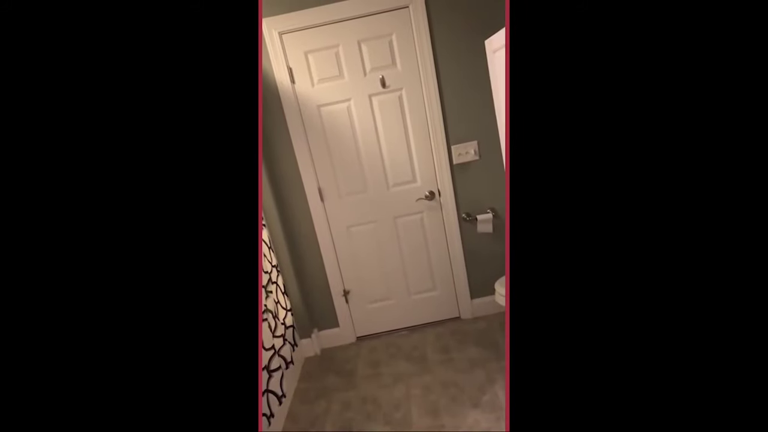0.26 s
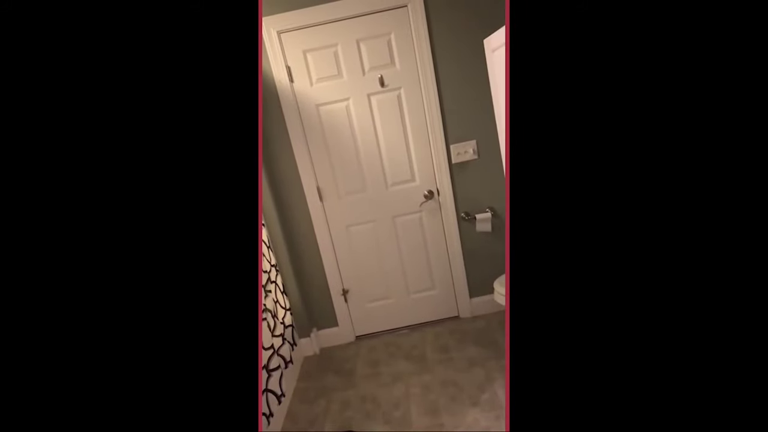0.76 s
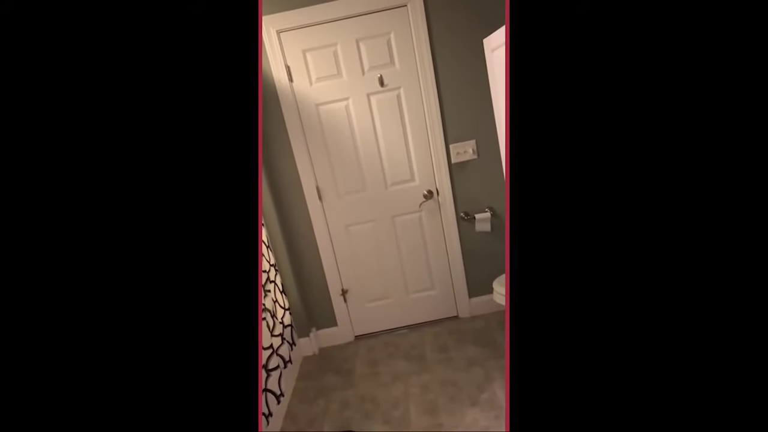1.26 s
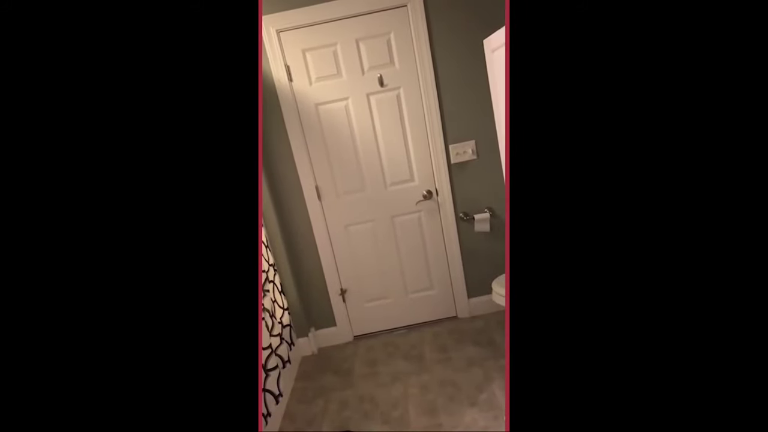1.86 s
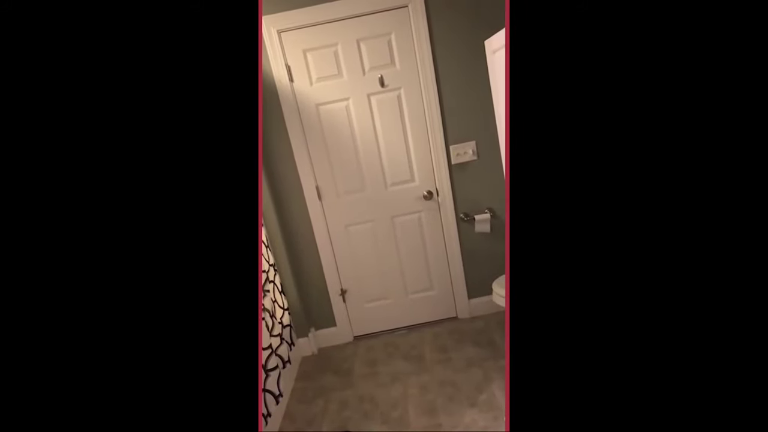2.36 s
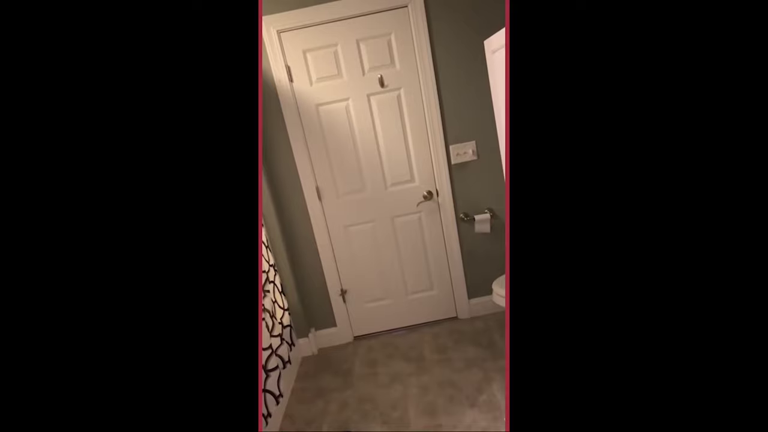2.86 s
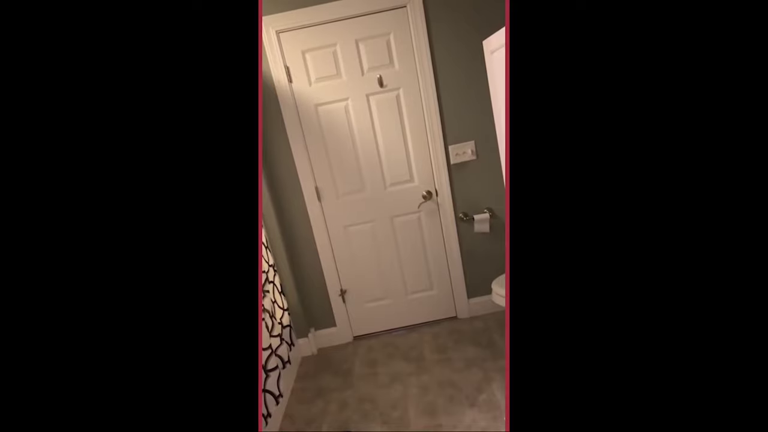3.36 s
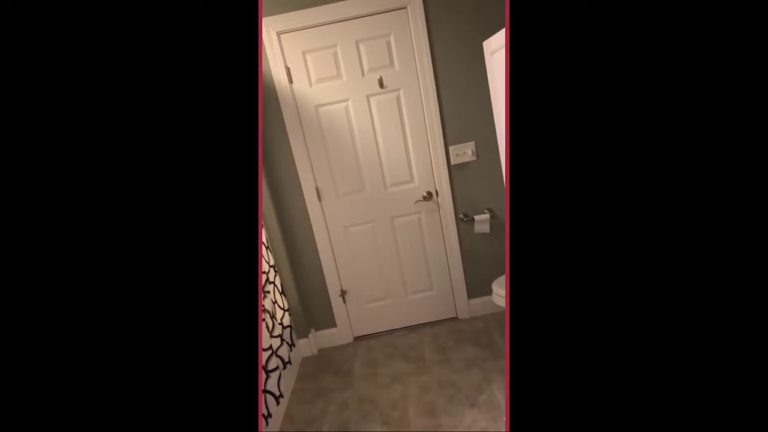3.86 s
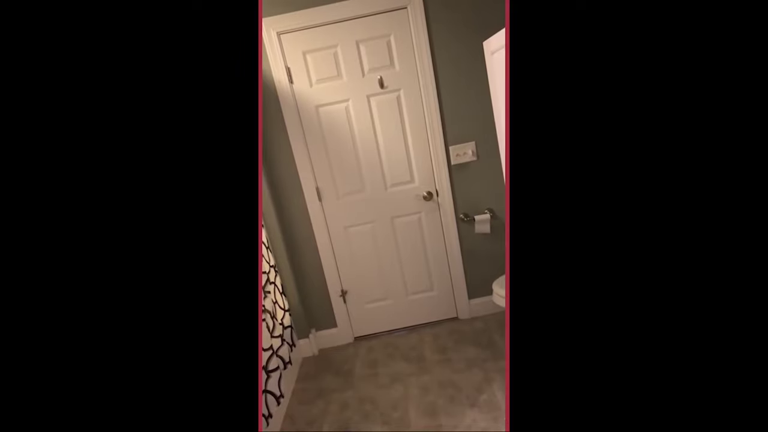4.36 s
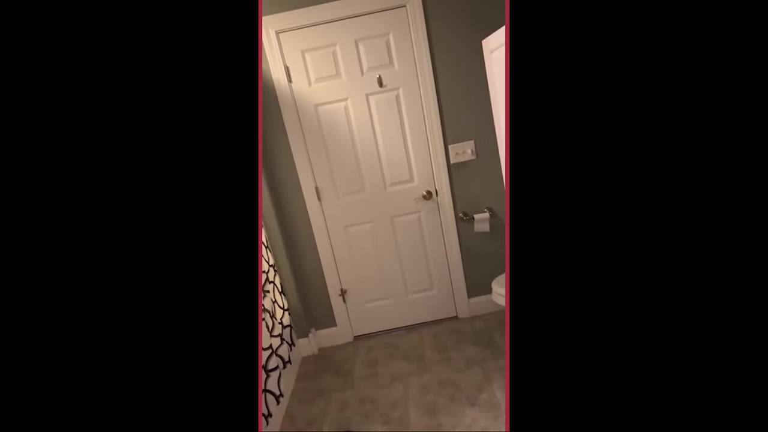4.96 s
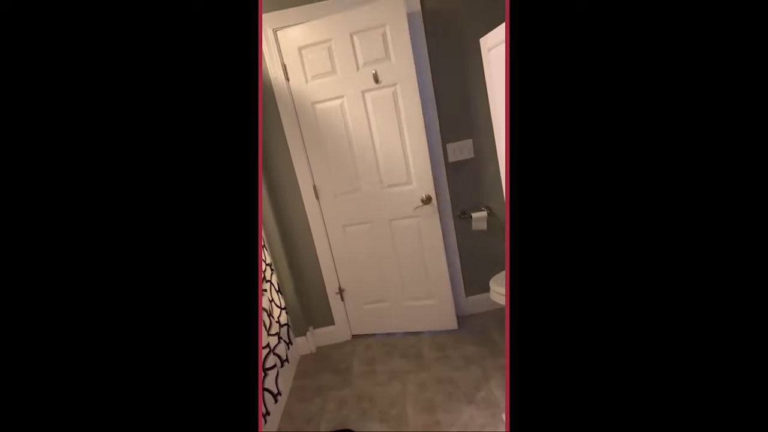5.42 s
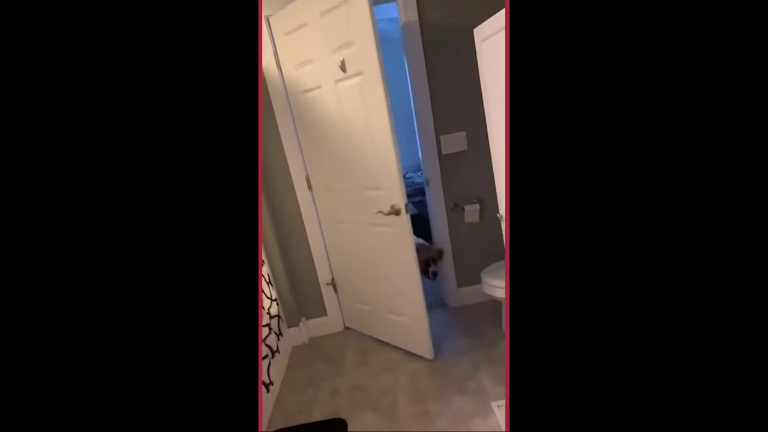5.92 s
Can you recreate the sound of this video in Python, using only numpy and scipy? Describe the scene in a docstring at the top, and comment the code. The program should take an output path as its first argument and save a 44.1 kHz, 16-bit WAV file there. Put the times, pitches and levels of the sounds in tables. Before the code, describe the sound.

Bursts of claw scrapes, hollow wooden knocks and clacking door hardware echo in a small tiled bathroom, ending with a paw skidding off the opening door.

```python
"""Dog pawing at a closed hollow door, heard in a tiled bathroom

Claws stick and slip down the panels in bursts; blows and shoves excite panel, skin and slab modes.
Lever, latch and claw tips clack with a ringing spring; claw scrapes, door ringing and pads give rough tones.
At last the latch gives: a paw skids off the swinging door with a slowing judder, and the door shudders.
Contacts pass through synthetic tiled-room responses, over a low house hush."""
import sys
import numpy as np
from scipy import signal
from scipy.fft import rfft, irfft
from scipy.io import wavfile
from scipy.ndimage import uniform_filter1d

SR = 44100
rng = np.random.default_rng(int(sys.argv[2]) if len(sys.argv) > 2 else 0)


def digitize_waveform(pressure):
    """Quantize a signal to 16-bit integers and store it at the path in sys.argv[1].

    Rows of a 2-D input are taken as channels; values are limited to [-1, 1].
    """
    field = np.atleast_2d(pressure).T
    bounded = np.clip(field, -1, 1)
    quanta = np.round(bounded * 32767).astype(np.int16)
    wavfile.write(sys.argv[1], SR, quanta)


N = 272929
TIME_S = np.arange(N) / SR
RING_S = np.arange(SR) / SR

# Levels are relative unless a function uses them without a further gain.
# paw blows on the panels: [start_s, hard_rap_db, dull_pad_thud_db]
KNOCKS = [(0.01, -17, -21.5), (0.429, -42.5, -44), (0.576, -13, -20.5), (0.834, -17.5, -30),
          (0.907, -23.5, -18.5), (0.931, -16.5, -26), (1.001, -22.5, -31.5), (1.082, -16, -35.5),
          (1.164, -18.5, -39), (1.24, -30, -34.5), (1.644, -21, -30), (1.672, -20.5, -29),
          (1.697, -18, -12), (1.737, -22, -46), (1.771, -18, -41.5), (1.784, -26.5, -25),
          (1.949, -22.5, -41.5), (1.996, -25.5, -39.5), (2.068, -32.5, -32.5), (2.1, -28.5, -32),
          (2.335, -42, -49), (2.376, -21, -23.5), (2.417, -31.5, -19), (2.454, -17, -21.5),
          (2.491, -35, -15), (2.523, -20, -18), (2.562, -19.5, -18), (2.689, -21.5, -33.5),
          (2.839, -26, -28), (3.298, -38, -60), (3.662, -21.5, -37), (3.682, -28.5, -40), (3.718, -17, -27),
          (3.755, -15.5, -14), (3.832, -12, -20), (3.854, -21.5, -31.5), (4, -39.5, -28), (4.052, -32, -40),
          (4.276, -14, -22), (4.323, -15, -32), (4.381, -11.5, -24.5), (4.435, -16, -13),
          (4.507, -18, -15.5), (4.563, -23, -33), (4.842, -24.5, -25), (4.997, -14.5, -22.5),
          (5.07, -12.5, -38.5), (5.125, -27, -14.5), (5.184, -21, -19.5), (5.29, -31, -12.5),
          (5.49, -27.5, -38), (5.525, -33, -45), (5.686, -22.5, -20), (5.745, -25, -22), (5.82, -29, -37),
          (5.9, -35, -20.5)]
# clacks of lever, latch and claw tips: [start_s, clack_db, metallic_snap_db]
CLACKS = [(0.0162, -23, -40.5), (0.521, -45, -54.5), (0.576, -29.5, -38.5), (0.754, -31, -45.5),
          (.8357, -31.5, -41), (0.874, -29.5, -35), (0.924, -27.5, -35.5), (0.934, -29.5, -46.5),
          (1, -28.5, -41), (1.084, -36, -60), (1.163, -21, -32.5), (1.35, -46.5, -57.5),
          (1.365, -31.5, -44.5), (1.687, -22.5, -43), (1.738, -19, -36.5), (1.934, -28, -44),
          (1.948, -22.5, -30.5), (2.091, -38.5, -57), (2.374, -30.5, -53.5), (2.3986, -22.5, -34),
          (2.4433, -19, -35.5), (2.459, -25, -34), (2.5474, -21.5, -38), (2.659, -16.5, -29),
          (2.84, -47, -68), (3.288, -44, -73), (3.677, -29, -44.5), (3.717, -26, -42),
          (3.7536, -19.5, -33.5), (3.773, -21, -36), (3.8249, -23.5, -32), (3.855, -38, -42),
          (4.11, -38.5, -61.5), (4.1383, -29.5, -48), (4.2232, -31, -49), (4.2549, -25, -30.5),
          (4.3128, -20.5, -32), (4.375, -29, -35), (4.4276, -25, -31.5), (4.842, -22.5, -42),
          (4.996, -27, -32), (5.0587, -24.5, -32.5), (5.112, -20.5, -33), (5.202, -26.5, -46),
          (5.249, -25, -51), (5.3395, -19.5, -64), (5.519, -36, -50), (5.683, -18, -29),
          (5.7284, -25.5, -30.5), (5.79, -29, -29)]
# dog's weight bumping the door in its frame: [start_s, slab_sway_db, skin_boom_db]
SHOVES = [(0.011, -39, -34.5), (0.576, -36, -40), (0.839, -26, -38.5), (1.004, -36, -28),
          (1.079, -52, -35.5), (1.164, -48, -29.5), (1.371, -33, -45.5), (1.771, -40, -35),
          (2.068, -31.5, -38.5), (2.454, -17, -32.5), (2.518, -23, -32.5), (2.659, -29, -35),
          (3.756, -49, -27.5), (3.829, -22, -24.5), (3.997, -30, -40.5), (4.427, -20, -29),
          (4.505, -47, -27.5), (4.579, -45, -44), (5.127, -27, -42), (5.196, -24, -43), (5.299, -35, -38),
          (5.429, -41, -52), (5.789, -25.5, -27.5), (5.901, -39, -42)]
# paw strokes down the door: [start_s, length_s, crest_share_of_length, wood_drag_db, claw_bite_db]
STROKES = [(0.166, 0.11, 0.5, -39.5, -22.5), (0.529, 0.078, 0.26, -57, -36),
           (0.745, 0.24, 0.85, -33, -27.5), (0.841, 0.17, 0.78, -22, -25.5),
           (0.99, 0.18, 0.28, -22.5, -24.5), (1.16, 0.13, 0.24, -24.5, -27.5),
           (1.359, 0.17, 0.12, -36.5, -44), (1.656, 0.15, 0.31, -16, -21), (1.94, 0.077, 0.15, -23.5, -42),
           (1.981, 0.14, 0.49, -31, -35), (2.288, 0.09, 0.9, -37, -37.5), (2.36, 0.14, 0.42, -18.5, -23.5),
           (2.472, 0.2, 0.2, -19.5, -19), (2.649, 0.074, 0.46, -23.5, -24), (2.75, 0.091, 0.62, -35.5, -31),
           (3.294, .12, 0.67, -47.5, -65), (3.676, 0.19, 0.94, -19.5, -25.5), (3.78, 0.15, 0.41, -25, -25),
           (4.106, 0.138, 1, -22.5, -23), (4.231, 0.17, 0.77, -19, -18), (4.36, 0.19, 0.27, -20, -17.5),
           (4.501, 0.17, 0.43, -24, -26.5), (4.849, 0.17, 0.13, -24, -22.5),
           (4.963, 0.21, 0.29, -26.5, -25.5), (5.11, 0.21, 0.43, -22, -18), (5.215, 0.17, 0.64, -32, -19),
           (5.434, 0.24, 0.14, -33.5, -26.5), (5.689, 0.23, 0.33, -19.5, -21),
           (5.82, 0.087, 0.39, -38, -50)]
# brief rough tones, claw scrapes and, near 1.1 kHz, the door ringing: [start_s, length_s, pitch_hz, level_db]
BRIEF_TONES = [(.005, 0.028, 3080, -51), (0.202, 0.069, 3070, -46), (.865, 0.027, 6000, -39),
               (.92, 0.025, 5760, -33.5), (1.035, 0.071, 3700, -37), (1.366, 0.042, 3365, -42.5),
               (1.755, 0.029, 1156, -28), (2.538, 0.047, 2700, -29.5), (3.845, 0.022, 3980, -32),
               (4.155, 0.051, 2550, -41), (4.391, 0.04, 1107, -27), (5.008, 0.032, 1058, -30.5),
               (5.057, 0.023, 4120, -36), (5.2, 0.032, 6300, -31), (5.732, 0.027, 3170, -33.5)]
# pad juddering on a panel, hollow notes: [start_s, length_s, pitch_hz, level_db]
RUBS = [(.915, 0.08, 406.6, -28.5), (1.68, 0.047, 412, -19.5), (2.385, 0.064, 441.4, -22.5),
        (2.50, 0.087, 210, -27), (2.53, 0.081, 382, -26.5), (2.67, 0.055, 353.5, -29),
        (3.705, 0.07, 440, -23.5), (3.80, 0.071, 192.8, -23), (3.87, 0.078, 403, -26),
        (4.14, 0.11, 437.6, -31.5), (4.255, 0.051, 451, -20.5), (4.36, .10, 457, -22),
        (4.485, 0.07, 204, -29.5), (4.835, 0.053, 401.6, -30), (5.11, 0.081, 360, -28.5),
        (5.26, 0.04, 321, -23), (5.68, 0.054, 422, -27.5)]
# paw skidding off the opening door: [time_s, slip_rate_hz, level_db]
SKID = [(5.68, 466, -27.5), (5.725, 340, -26.5), (5.757, 265, -22), (5.783, 267, -34), (5.815, 290, -21.5),
        (5.845, 234, -25), (5.87, 250, -39)]
# freed door shuddering: [time_s, pitch_hz, level_db]
SHUDDER = [(5.803, 175, -31), (5.832, 135, -24), (5.85, 113, -16), (5.876, 108, -16.5), (5.92, 102, -30)]

# whole-slab sway modes: [mode_hz, level_db, t60_s]
SLAB_MODES = [(33.1, -3, 0.32), (45.6, 3, 0.34), (51.3, 10.5, 1), (59.9, 3, 0.88)]
# hollow-skin boom modes: [mode_hz, level_db, t60_s]
SKIN_MODES = [(84.5, -1.5, 0.39), (91.85, 0, 0.97), (111.7, -6.5, 0.81), (184.65, -2, 0.74)]
# panel and small-room modes: [mode_hz, level_db, t60_s]
PANEL_MODES = [(187.9, -4.5, 1), (235.5, -3, 0.69), (274.5, -7.5, 0.77), (330, -6.5, 0.27), (389, 3.5, 0.4),
               (442.5, 0.5, 0.4), (461.8, 3, 0.49), (567, -9.5, 0.74), (603, -10, 0.38), (736, -9, 0.83),
               (905, -6, 0.34), (1085, -5.5, 0.28), (1243, -9.5, 0.3), (1440, -13.5, 0.15)]
# lever spring partials: [partial_hz, level_db]
SPRING_PARTIALS = [(8441, 0), (9130, -5), (10998, -11), (12575, -1), (13954, -9), (15332, -8)]

# spectrum of hard contact on wood: [freq_hz, density_db_per_hz]
WOOD_COLOUR = [(40, -8.5), (130, -15.5), (200, -9.5), (300, 1.5), (400, -2), (520, -3.5), (700, -4.5),
               (1100, -8), (1500, -10.5), (2100, -23), (3500, -23.5), (6000, -38.5), (15000, -48.5)]
# spectrum of a soft pad thud: [freq_hz, density_db_per_hz]
PAD_COLOUR = [(40, -5.5), (150, -16.5), (240, 0), (330, 1.5), (460, 2), (600, -11.5), (900, -16),
              (1500, -28), (4000, -45), (15000, -71.5)]
# spectrum of claw tips: [freq_hz, density_db_per_hz]
CLAW_COLOUR = [(200, -27.5), (1000, -5.5), (2200, -6), (3800, -1), (5800, -3.5), (7500, -7), (11000, -7.5),
               (15000, -18.5)]
# spectrum of lever and latch: [freq_hz, density_db_per_hz]
LATCH_COLOUR = [(200, -1.5), (1000, 3), (2200, 0.5), (3000, 5), (4000, 3), (5800, 4), (7500, -4.5),
                (11000, -20), (15000, -29.5)]
# spectrum of the high metallic snap: [freq_hz, density_db_per_hz]
SNAP_COLOUR = [(2000, -41), (5500, -10.5), (7500, 2.5), (10000, 7), (12000, 3.5), (15000, -5.5)]
# spectrum of the house hush: [freq_hz, density_db_per_hz]
HUSH_COLOUR = [(25, -16.5), (55, 6.5), (90, -3.5), (180, -3.5), (260, -1.5), (400, -15), (550, -25),
               (800, -23.5), (1300, -37), (2000, -43.5), (6000, -48.5), (11000, -51), (15000, -65)]

# bathroom echo decay: [freq_hz, t60_s]
ROOM_T60 = [(60, 0.96), (200, 0.6), (450, 0.53), (1100, 0.38), (3000, 0.37), (7500, 0.29), (15000, 0.29)]
# left-right likeness: [freq_hz, correlation]
STEREO_LIKENESS = [(60, 1), (180, .99), (350, 0.96), (600, 0.31), (1400, 0.33), (3000, 0.57), (6000, 0.74),
                   (8500, 0.1), (14000, 1)]
# narrow treble bands the microphone hears weakly: [centre_hz, width_hz, depth_db]
MIC_DIPS = [(4740, 318, 17.5), (8190, 130, 12.5), (8880, 236, 17), (10260, 212, 22), (11900, 61, 16),
            (14040, 200, 12.5)]

# stroke pressure: landing and lift ramps, rise to the crest, fall after it
LAND_S, SWELL_DB, EASE_DB, LIFT_S = 0.0075, 4.5, 9, 0.022
# share of every rap that sways the slab and booms its skin
KNOCK_SWAY_DB, KNOCK_BOOM_DB = -22.5, -31.5
# early reflections off the frame and nearest tiles: boost and its decay time
EARLY_DB, EARLY_S = 5.5, 0.0016
SPRING_DB = -17.5  # relative to the clack force
EDGE_HZ = 15600


def amp(db):
    """Decibels to gain."""
    return 10 ** (np.asarray(db) / 20)


def read(points, freq_hz):
    """Interpolates a table on a log-frequency axis."""
    point_hz, value = np.transpose(points)
    return np.interp(np.log(freq_hz + 1), np.log(point_hz), value)


def unit(x):
    """Scales to unit energy, averaged over channels."""
    return x / np.sqrt(np.mean(np.sum(x ** 2, -1)))


def add(mix, start_s, sound):
    """Mixes a sound in place at start_s."""
    part = mix[max(round(start_s * SR), 0):][:len(sound)]
    part += sound[:len(part)]


def through(force, response):
    """Convolves a force with a one- or two-channel response."""
    return signal.fftconvolve(force[None], np.atleast_2d(response), axes=1)[:, :N]


def paired(x, colour):
    """Colours two independent signals and blends them into left-right at the tabled likeness."""
    freq_hz = np.fft.rfftfreq(x.shape[1], 1 / SR)
    likeness = np.clip(read(STEREO_LIKENESS, freq_hz), -1, 1)
    mid, side = rfft(x) * np.sqrt([1 + likeness, 1 - likeness]) * amp(read(colour, freq_hz))
    return irfft([mid + side, mid - side], x.shape[1])


def room(colour, direct=0.16):
    """Tiled-room response: weak direct sound, early knot, dense echoes decaying by band."""
    noise = rng.standard_normal((2, SR))
    freq_hz, frame_s, bins = signal.stft(noise, SR, nperseg=256)
    decay = amp(-60 * frame_s / read(ROOM_T60, freq_hz)[:, None])
    tail = signal.istft(bins * decay, SR, nperseg=256)[1][:, :SR]
    tail = unit(tail * amp(EARLY_DB * np.exp(-RING_S / EARLY_S)))
    tail[0, 0] += direct  # mid channel only
    lead = 64  # samples, room for the colour filter's pre-ring
    return unit(paired(np.pad(tail, ((0, 0), (lead, SR))), colour)[:, :SR])


def spots(force, colour, direct, half_turns_per_s=5.3, count=4):
    """A contact wanders over the door; each spot reaches the ear by other echoes."""
    out = 0
    for k in range(count):
        share = np.cos(np.pi * (half_turns_per_s * TIME_S + k / count)) * np.sqrt(2 / count)
        out = out + through(force * share, room(colour, direct))
    return out


def modes(rows):
    """Impulse response of damped modes, alternating in sign."""
    ring = np.zeros(SR)
    for k, (mode_hz, level_db, t60_s) in enumerate(rows):
        decay = amp(level_db - 60 * RING_S / t60_s)
        ring += (-1) ** k * decay * np.sin(2 * np.pi * mode_hz * RING_S)
    return unit(ring)


def blows(starts_s, levels_db, chatter, settle_s, touch_db=-12, touch_s=.007):
    """Each blow: light first touch, one impact, quickly dying chatter of loose parts."""
    force, lead = np.zeros(N), SR // 20
    t_s = np.arange(-lead, 2 * lead) / SR
    touch = amp(touch_db) * np.exp(-abs(t_s) / touch_s)
    shape = np.where(t_s < 0, touch, np.exp(-abs(t_s) / settle_s))
    for start_s, level_db in zip(starts_s, levels_db):
        hit = chatter * unit(rng.standard_normal(len(t_s)) ** 3 * shape)  # cubed: spiky
        hit[lead] += 1
        cut = max(lead - round(start_s * SR), 0)  # touch before time zero
        add(force, start_s + t_s[0], amp(level_db) * unit(hit)[cut:])
    return force


def slips(per_s, spread_db, clump_db, clump_hz):
    """Stick-slip: sparse jerks of uneven size and random sign, in clumps; rms 1."""
    knots_s = np.arange(0, TIME_S[-1] + 1, 1 / clump_hz)
    clumps = np.interp(TIME_S, knots_s, rng.standard_normal(N)[:len(knots_s)])
    uneven_db = spread_db * np.minimum(rng.exponential(1, N), 2)
    size = amp(uneven_db + clump_db * np.clip(clumps, -2, 1))
    happens = rng.random(N) < per_s / SR
    return np.sqrt(N) * unit(size * rng.choice([-1, 1], N) * happens)


def rough_tones(rows, jitter, smooth_samples):
    """Short, almost regular tones whose pitch wobbles at random."""
    out = np.zeros(N)
    for start_s, length_s, pitch_hz, level_db in rows:
        t_s = np.arange(0, length_s, 1 / SR)
        wobble = uniform_filter1d(rng.standard_normal(SR), size=smooth_samples)
        wobble = np.sqrt(SR) * unit(wobble)[:len(t_s)]
        phase = 2 * np.pi * np.cumsum(pitch_hz * (1 + jitter * wobble)) / SR
        add(out, start_s, amp(level_db) * np.sin(np.pi * t_s / length_s) * np.sin(phase))
    return out


def hush():
    """Low house hush: steady coloured noise."""
    noise = rng.standard_normal((2, N))
    return amp(-55.0) * np.sqrt(N) * unit(paired(noise, HUSH_COLOUR))


def brief_tones():
    """Brief rough tones with a hint of pitch: claw scrapes, and near 1.1 kHz the door ringing."""
    out = rough_tones(BRIEF_TONES, jitter=.075, smooth_samples=30)
    return amp(-0.5) * out + amp(-6.5) * through(out, room(LATCH_COLOUR))


def door(drag):
    """Blows and drag shake the panels and boom the skin; raps and the dog's weight sway the slab."""
    start_s, rap_db, thud_db = np.transpose(KNOCKS)
    raps = blows(start_s, rap_db, chatter=2.7, settle_s=0.018, touch_db=-3.0, touch_s=0.0092)
    thuds = blows(start_s, thud_db, chatter=1.34, settle_s=0.018, touch_db=-1.5, touch_s=0.019)
    push = blows(start_s, rap_db, chatter=0.054, settle_s=.02)
    hard, soft = drag + amp(21.0) * raps, amp(18.5) * thuds

    start_s, sway_db, boom_db = np.transpose(SHOVES)
    sway = amp(KNOCK_SWAY_DB) * push + blows(start_s, sway_db, chatter=.05, settle_s=.02)
    boom = amp(KNOCK_BOOM_DB) * push + blows(start_s, boom_db, chatter=0.041, settle_s=.02)
    boom = amp(-14.0) * drag + amp(29.5) * boom

    panels = spots(hard, WOOD_COLOUR, direct=0.38, half_turns_per_s=6.1)
    panels += spots(soft, PAD_COLOUR, direct=0.41, half_turns_per_s=4.3)
    panels = panels + amp(-8.5) * through(hard + soft, modes(PANEL_MODES))
    slab = through(amp(28) * sway, modes(SLAB_MODES))
    return panels + slab + through(boom, modes(SKIN_MODES))


def latch():
    """Metal and claw tips clack with high snaps; clacks ring the lever spring off to one side."""
    start_s, clack_db, snap_db = np.transpose(CLACKS)
    clacks = blows(start_s, clack_db, chatter=1.75, settle_s=0.0054, touch_db=-6, touch_s=0.009)
    snaps = blows(start_s, snap_db, chatter=2.2, settle_s=0.0057, touch_db=-5, touch_s=0.0095)
    clacks, snaps = amp(24) * clacks, amp(26.5) * snaps
    ring = modes([(partial_hz, level_db, .36) for partial_hz, level_db in SPRING_PARTIALS])
    spring = amp(SPRING_DB) * through(clacks, [np.roll(ring, 1), ring])  # left one sample late
    metal = spots(clacks, LATCH_COLOUR, direct=0.29) + spots(snaps, SNAP_COLOUR, direct=0.27)
    return metal + spring


def stroke(length_s, crest_share):
    """Stroke pressure: quick landing, swell to the crest, ease off, lift."""
    t_s = np.arange(0, length_s, 1 / SR)
    crest_s = np.clip(crest_share, .02, .98) * length_s
    press_db = np.interp(t_s, [0, crest_s, length_s], [-SWELL_DB, 0, -EASE_DB])
    return amp(press_db) * np.minimum(t_s / LAND_S, 1) * np.minimum((length_s - t_s) / LIFT_S, 1)


def catches(force, low_hz, high_hz, clump_db, count=40):
    """Claw catches at many pitches: short resonances, each with its own clumped jerks."""
    t_s, out = RING_S[:SR // 20], np.zeros(N)
    cycles = 12  # to decay by 1/e
    for pitch_hz in np.geomspace(low_hz, high_hz, count) * rng.uniform(0.94, 1.05, count):
        ring = unit(np.sin(2 * np.pi * pitch_hz * t_s) * np.exp(-t_s * pitch_hz / cycles))
        jerks = slips(per_s=200, spread_db=5.5, clump_db=clump_db, clump_hz=49.96)
        out += signal.oaconvolve(force * jerks, ring)[:N]
    return out / np.sqrt(count)


def scratching():
    """Claws drag down the door: stick-slip force on the wood, and rasp at the tips."""
    drag, bite = np.zeros(N), np.zeros(N)
    for start_s, length_s, crest_share, drag_db, bite_db in STROKES:
        pressure = stroke(length_s, crest_share)
        add(drag, start_s, amp(drag_db) * pressure)
        add(bite, start_s, amp(bite_db) * pressure)
    jerks = slips(per_s=330, spread_db=5, clump_db=5, clump_hz=70)
    ticks = slips(per_s=260, spread_db=6, clump_db=6, clump_hz=55)
    chatter = catches(bite, low_hz=2188, high_hz=11110, clump_db=11.5)
    rasp = amp(-20.5) * (bite * ticks + chatter)
    grate = amp(-14.5) * catches(drag, low_hz=698.6, high_hz=2289, clump_db=13.5, count=16)
    return amp(-7.0) * drag * jerks, rasp + grate


def rubs():
    """A juddering pad drives the panel hollows; the room holds the note."""
    out = rough_tones(RUBS, jitter=.22, smooth_samples=70)
    return amp(-3) * out + amp(-20) * through(out, room(PAD_COLOUR))


def judder(curve, jitter, lumps_db, rolloff, count=7):
    """Lumpy harmonic vibration following a curve of rate and level; count - 1 harmonics."""
    point_s, rate_hz, level_db = np.transpose(curve)
    noise = uniform_filter1d(rng.standard_normal((2, N)), size=150)
    wobble, lumps = np.sqrt(N) * unit(noise)
    jittered_hz = np.interp(TIME_S, point_s, rate_hz) * (1 + jitter * wobble)
    phase = 2 * np.pi * np.cumsum(jittered_hz) / SR
    wave = sum(np.sin(k * phase) / k ** rolloff for k in range(1, count))
    gate = uniform_filter1d(1. * (TIME_S > point_s[0]) * (TIME_S < point_s[-1]), size=400)
    return wave * gate * amp(np.interp(TIME_S, point_s, level_db) + lumps_db * np.clip(lumps, -2, 1))


def skid():
    """The pad's stick-slip judder slows as the door swings away; the freed door shudders low."""
    groan = judder(SKID, jitter=0.139, lumps_db=4, rolloff=2.25)
    thump = judder(SHUDDER, jitter=.05, lumps_db=1, rolloff=2.5)
    return groan + thump + amp(-21) * through(groan + amp(-6) * thump, room(WOOD_COLOUR))


def scene():
    """Sums door, hardware, claws and pads over the hush."""
    drag, bite = scratching()
    claws = spots(bite, CLAW_COLOUR, direct=0.32)
    return hush() + brief_tones() + door(drag) + latch() + claws + rubs() + skid()


def record(dry):
    """Microphone treble dips, then a low-pass band limit."""
    freq_hz = np.fft.rfftfreq(2 * N, 1 / SR)
    colour_db = -sum(depth_db * np.exp(-((freq_hz - centre_hz) / width_hz) ** 2)
                     for centre_hz, width_hz, depth_db in MIC_DIPS)
    heard = irfft(rfft(dry, 2 * N) * amp(colour_db))[:, :N]
    lowpass = signal.firwin(511, EDGE_HZ, window=("kaiser", 9), fs=SR)
    return signal.oaconvolve(heard, lowpass[None], "same")


dry = scene()
out = record(dry)
digitize_waveform(out)
```